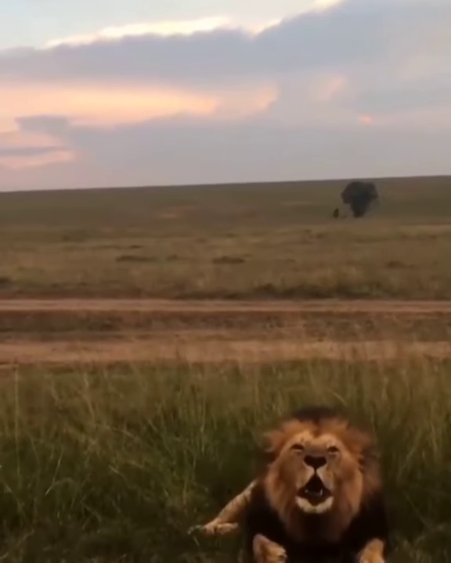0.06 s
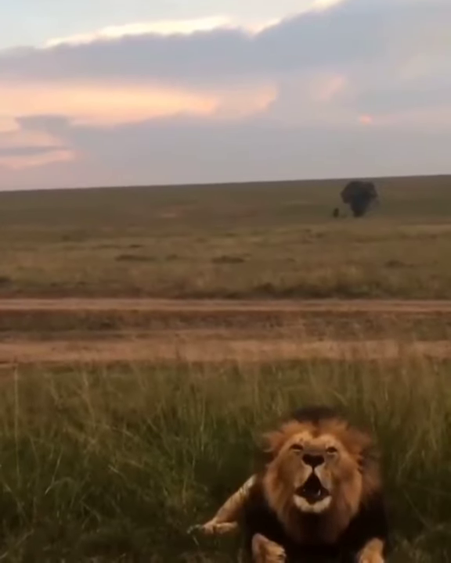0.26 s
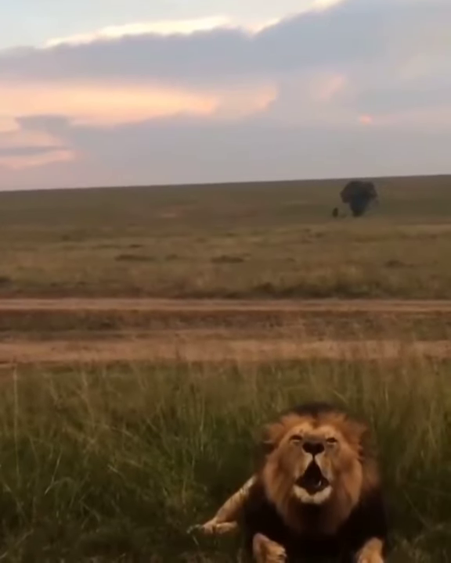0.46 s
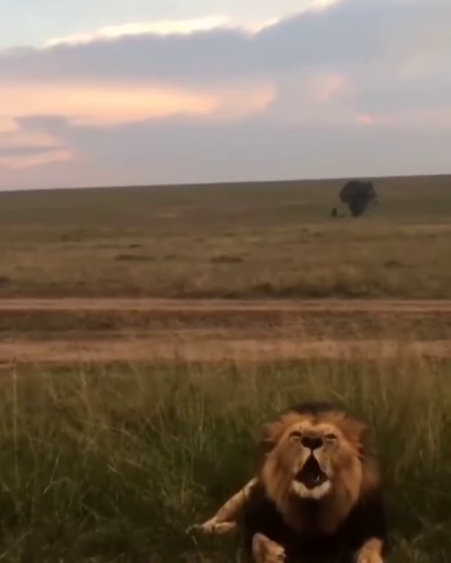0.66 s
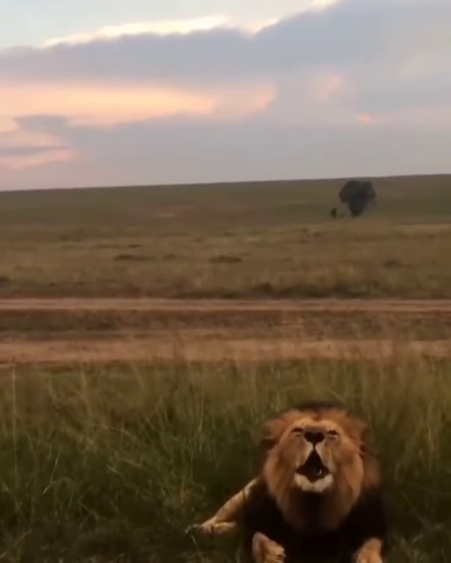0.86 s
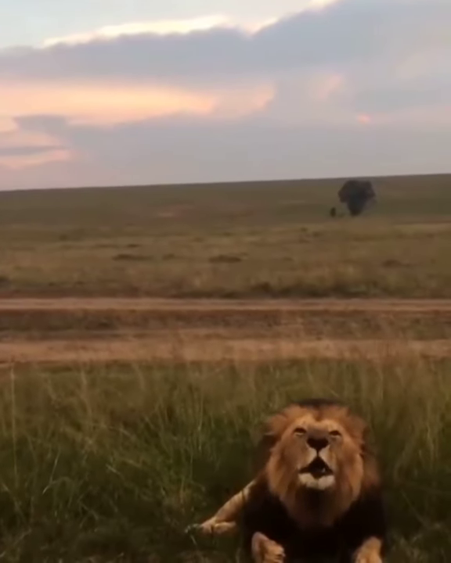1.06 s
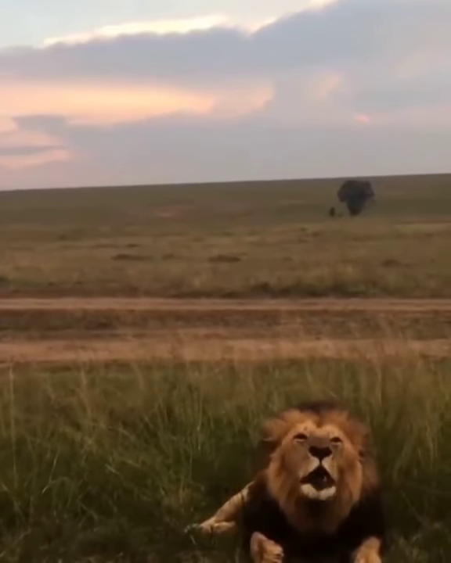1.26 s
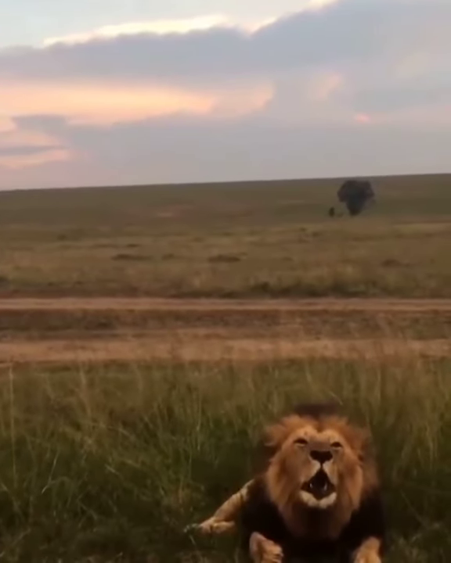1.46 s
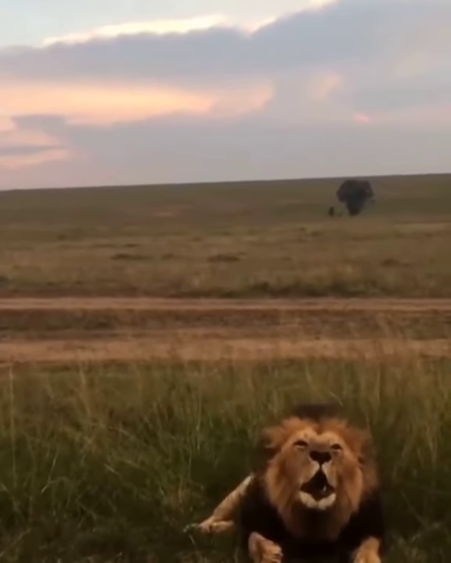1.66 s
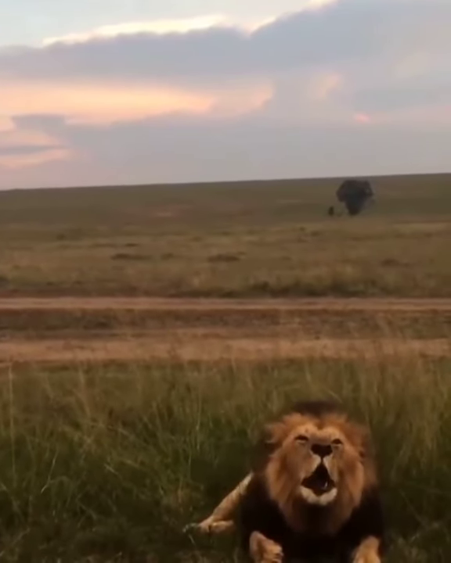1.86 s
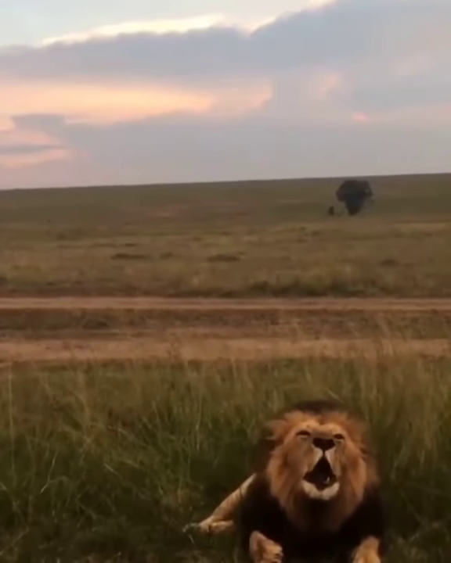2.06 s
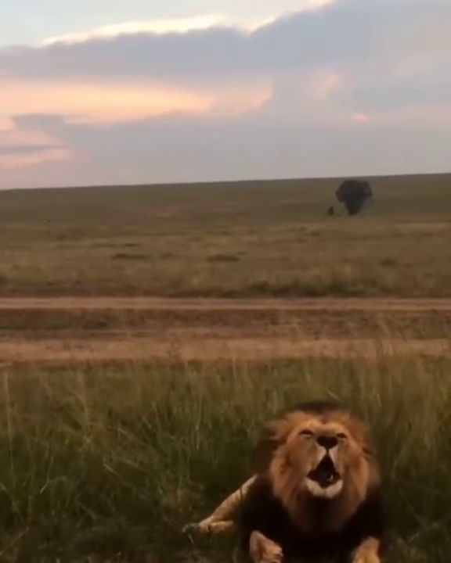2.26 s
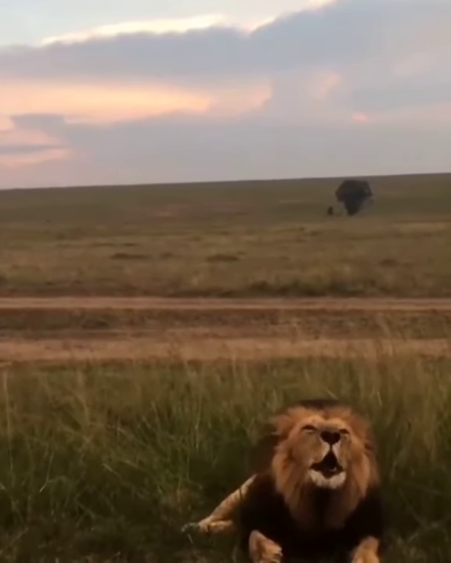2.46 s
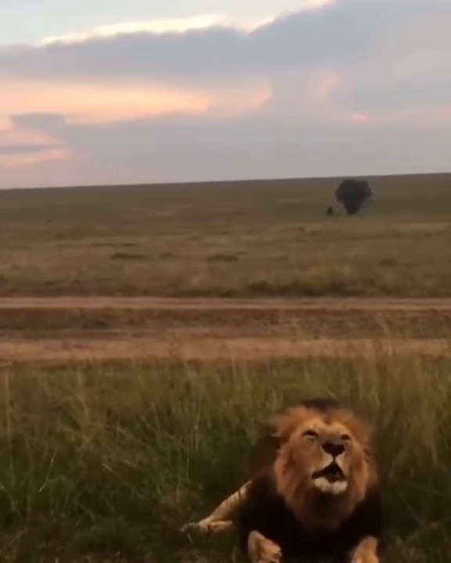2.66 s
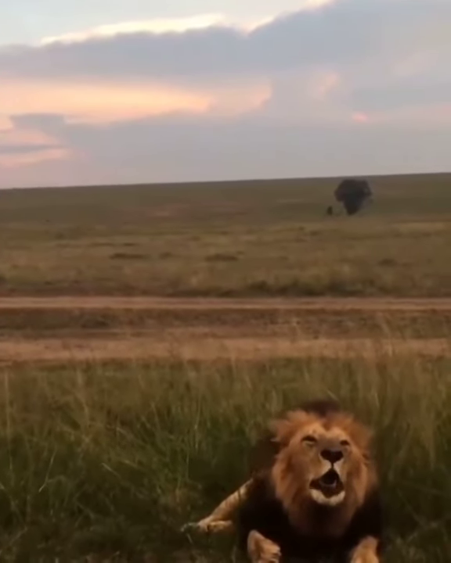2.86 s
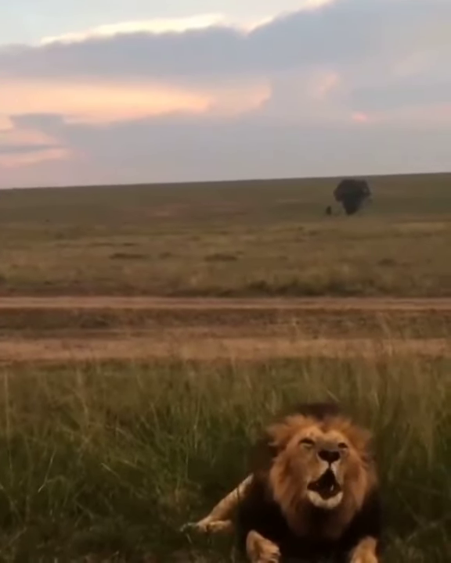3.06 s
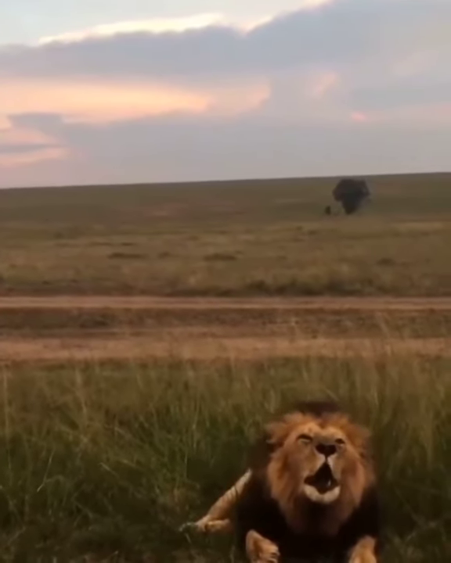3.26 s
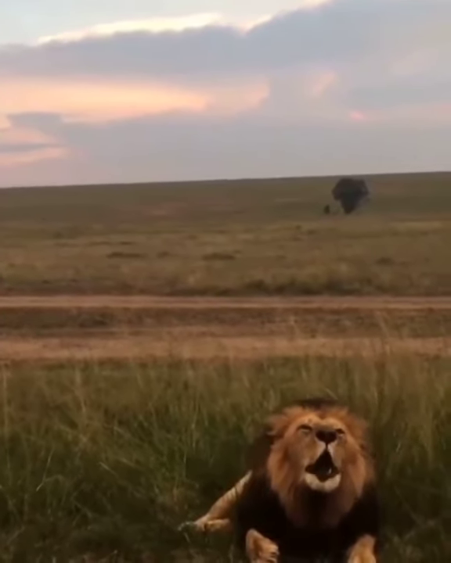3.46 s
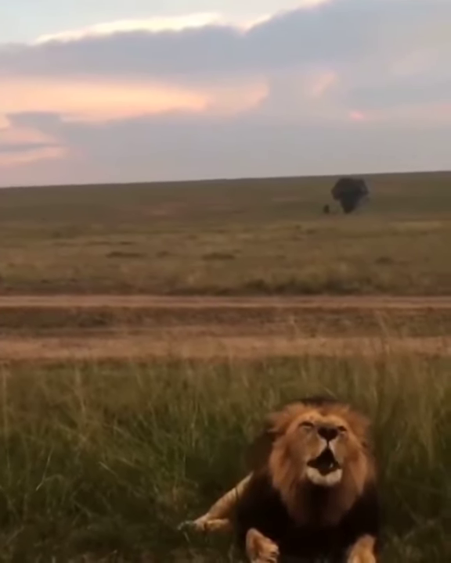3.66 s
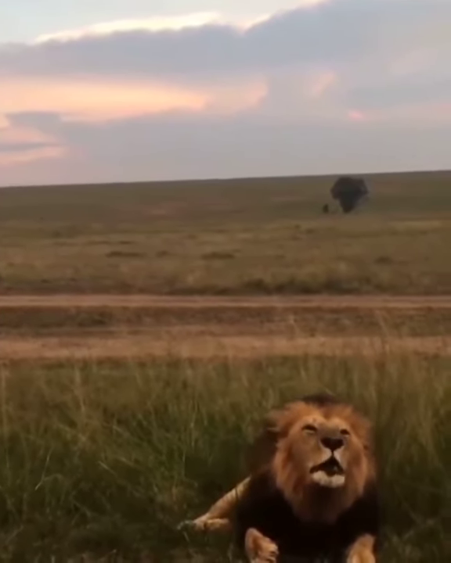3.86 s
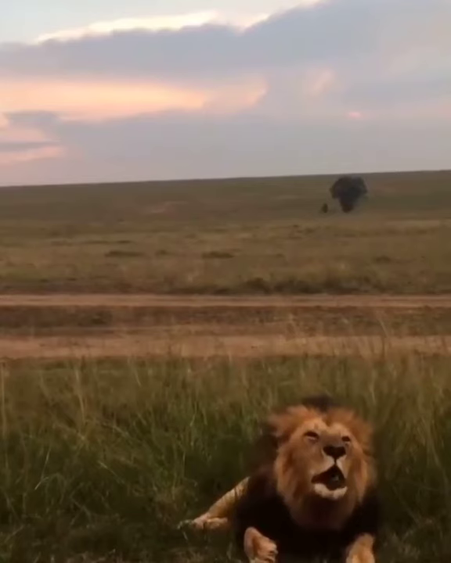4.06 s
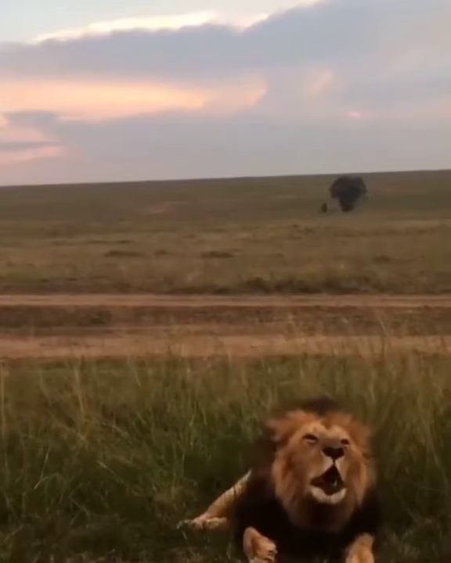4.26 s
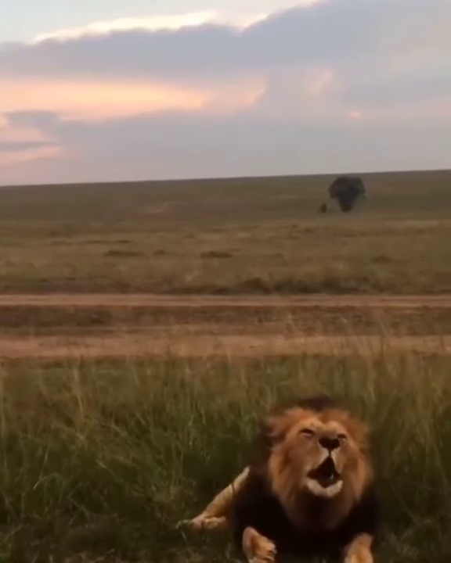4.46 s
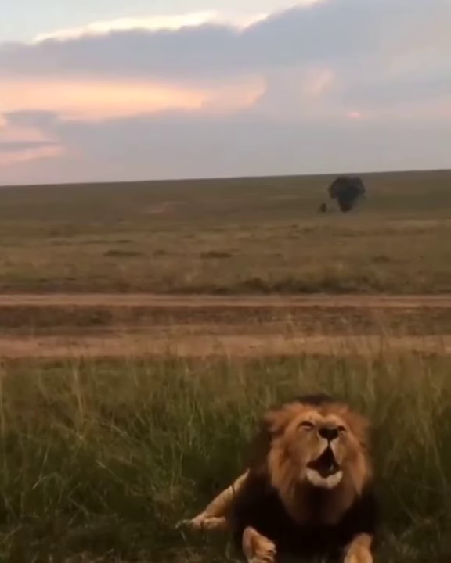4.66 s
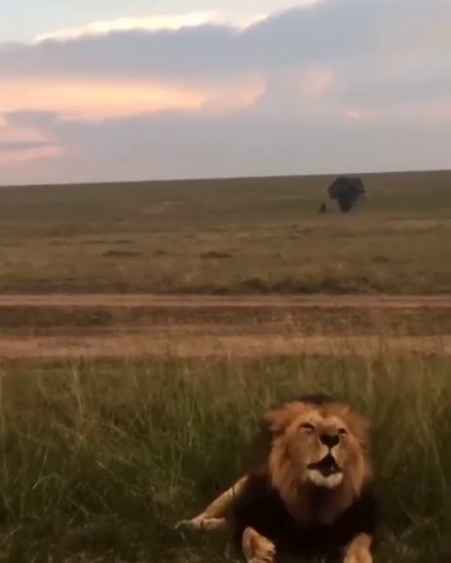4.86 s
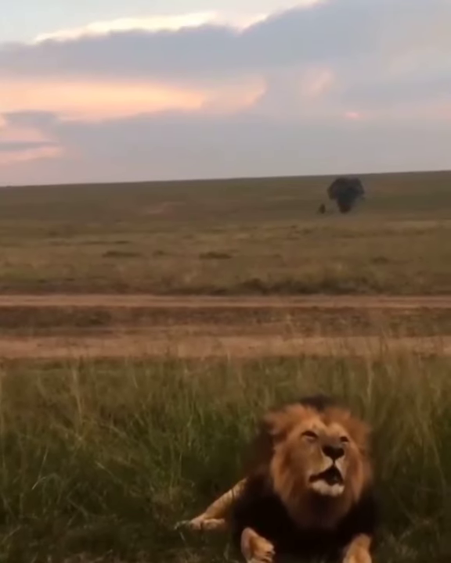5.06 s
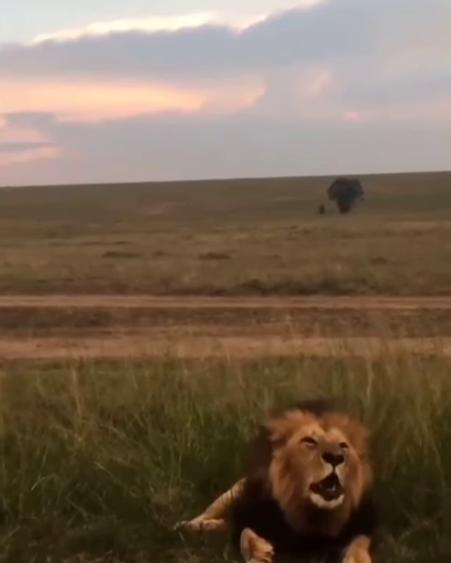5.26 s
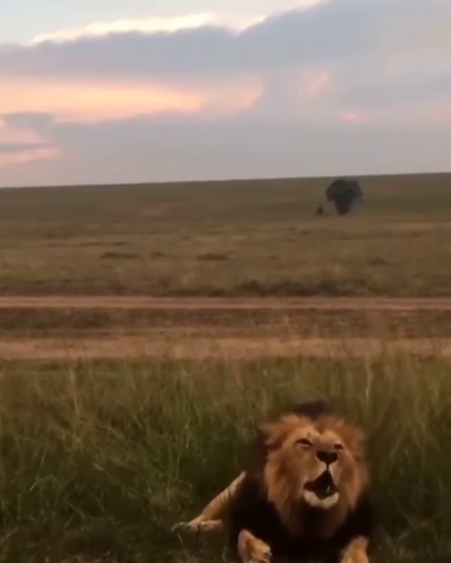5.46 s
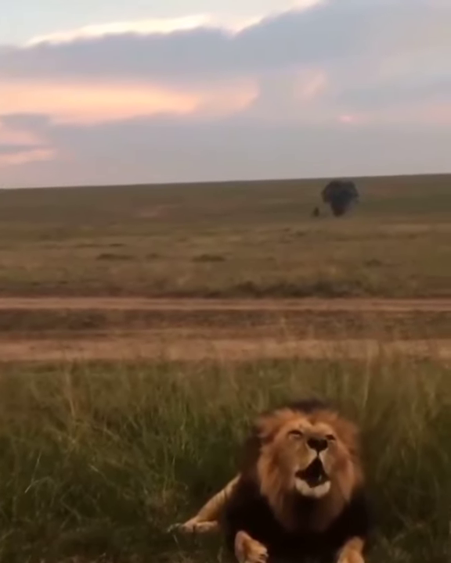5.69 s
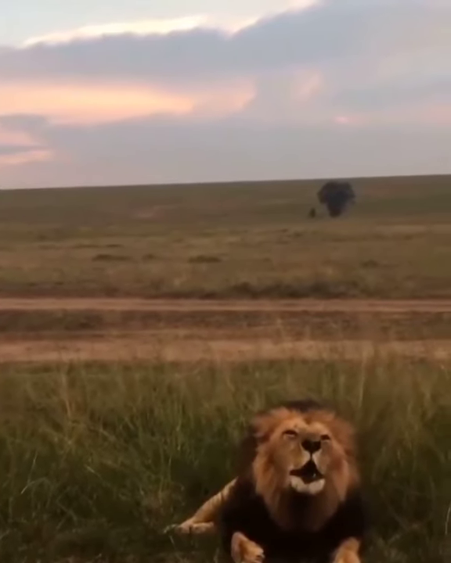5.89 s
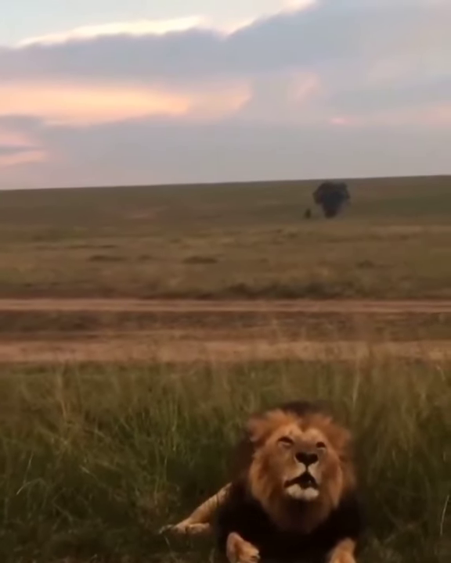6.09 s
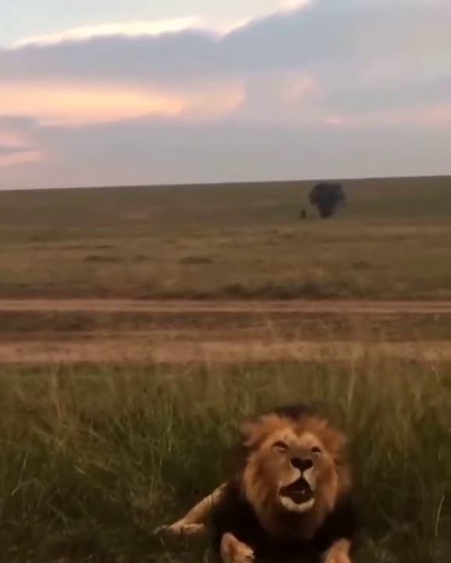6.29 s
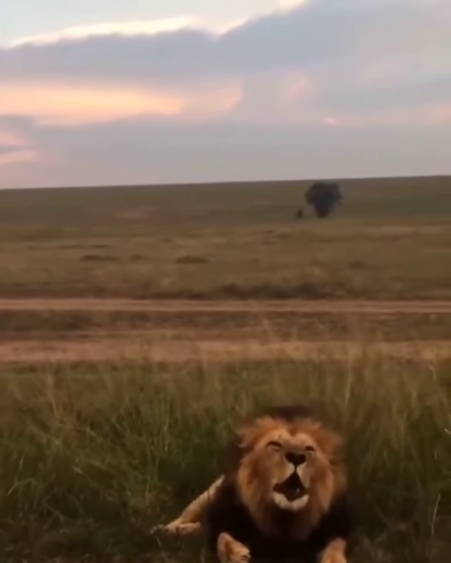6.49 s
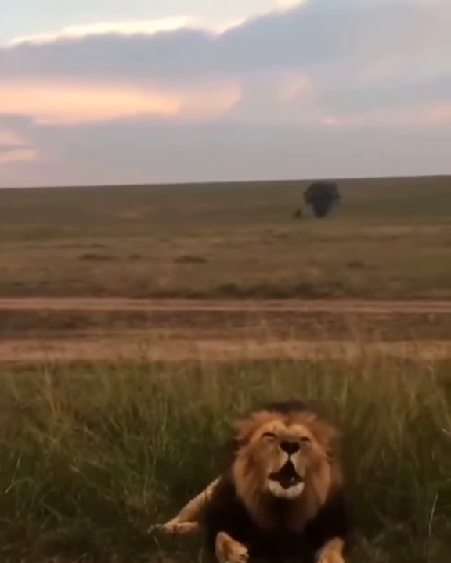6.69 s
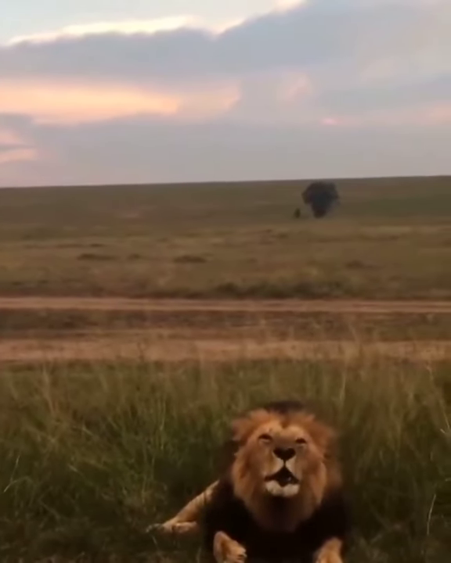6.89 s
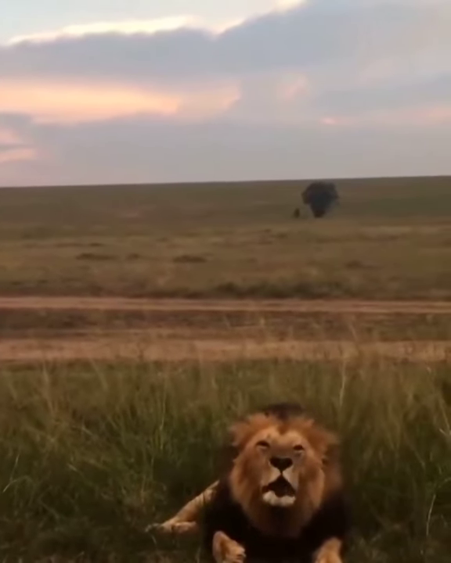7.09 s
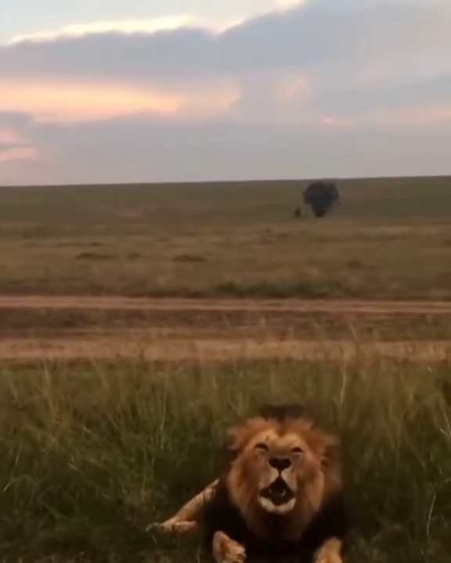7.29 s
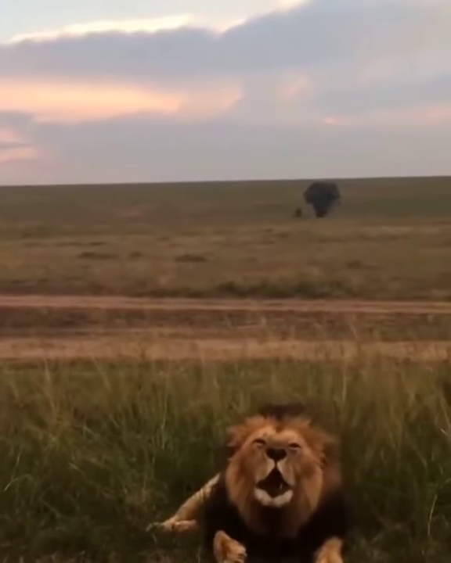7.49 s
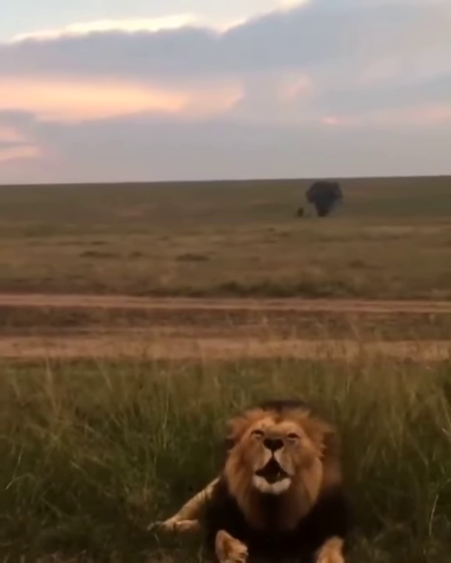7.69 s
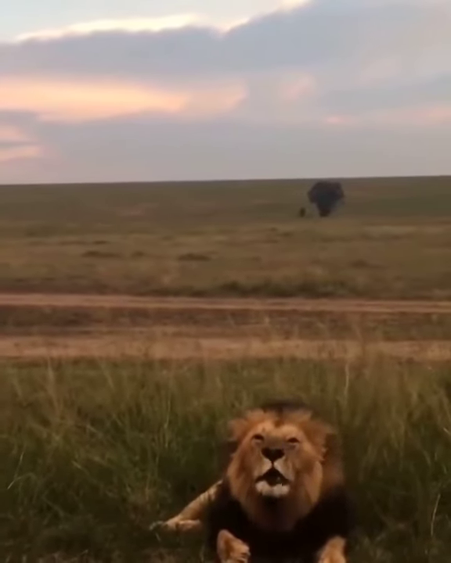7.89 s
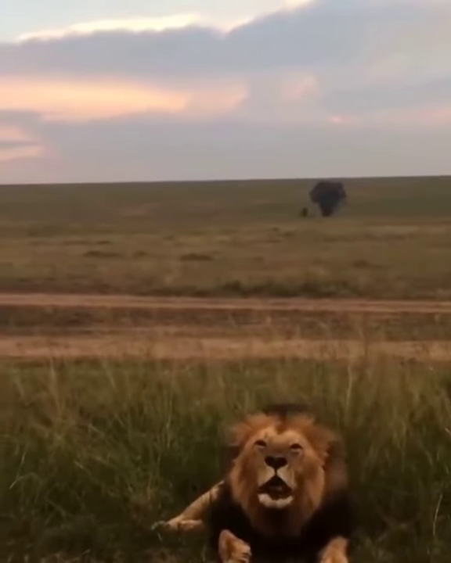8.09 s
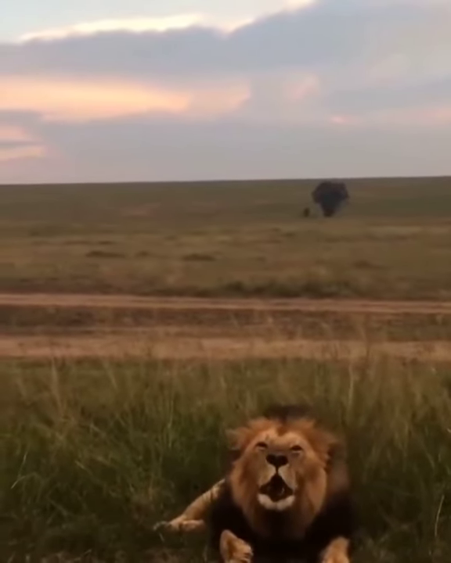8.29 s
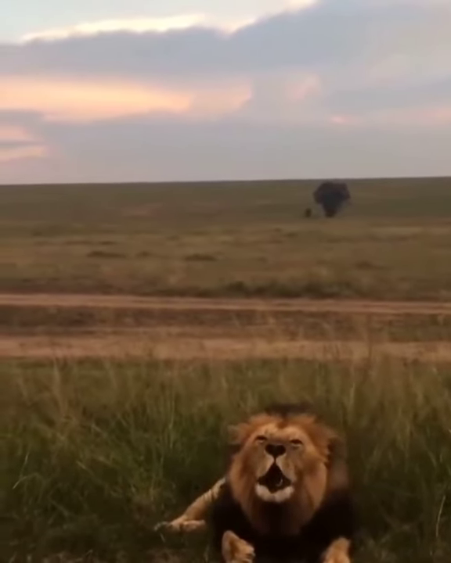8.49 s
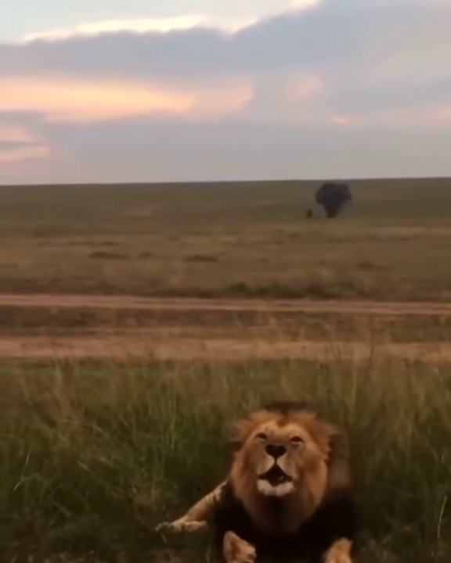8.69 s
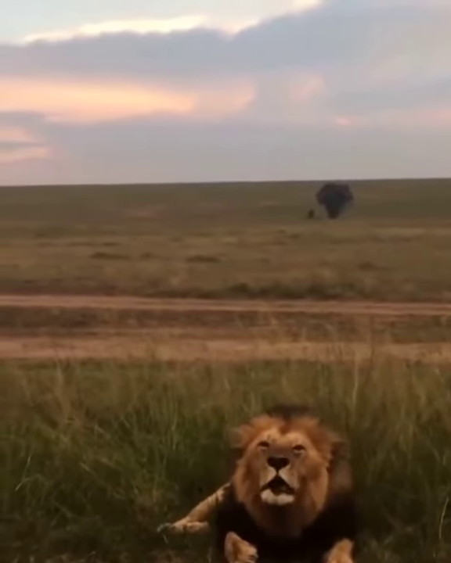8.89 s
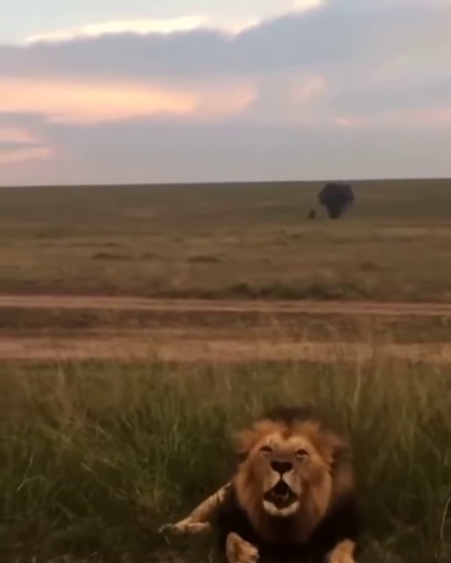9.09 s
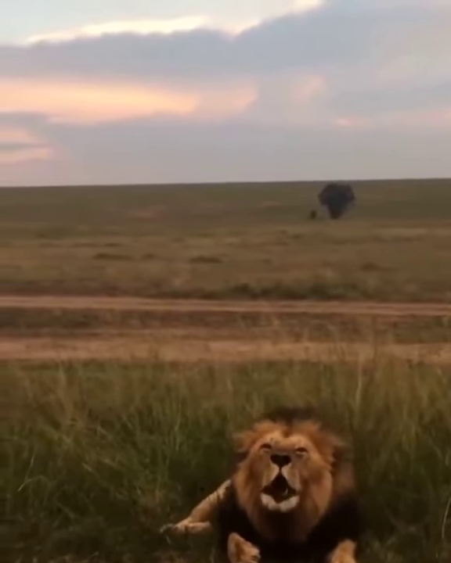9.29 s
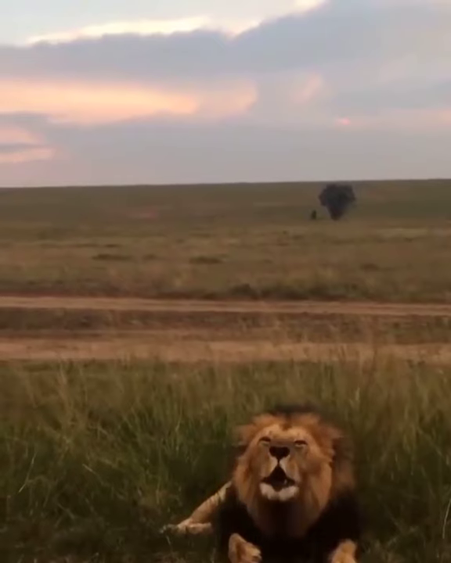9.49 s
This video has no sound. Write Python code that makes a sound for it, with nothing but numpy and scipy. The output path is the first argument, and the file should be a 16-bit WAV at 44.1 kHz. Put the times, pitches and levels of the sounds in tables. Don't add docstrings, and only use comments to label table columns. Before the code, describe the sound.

A male lion close by gives two full rough roars, then seven lower, quickening grunts, breathing in between, with camera shutter clacks and light wind.

```python
import sys
import numpy as np
from scipy import signal
from scipy.fft import rfft, irfft, next_fast_len
from scipy.io import wavfile
from scipy.ndimage import uniform_filter1d

SR = 44100
rng = np.random.default_rng(int(sys.argv[2]) if len(sys.argv) > 2 else 0)


def unload_audio(sound):
    columns = np.transpose(np.atleast_2d(sound))
    steps = np.round(np.clip(columns, -1, 1) * 32767)
    wavfile.write(sys.argv[1], SR, steps.astype(np.int16))


def convert_level_to_amplitude(level_db):
    exponent = np.asarray(level_db, float) / 20
    return 10 ** exponent


N = 420713
ROAR_HZ = 130

TRACT = [(0, .95), (.15, 1.0), (.35, 1.015), (.6, .93), (1, .86)]
# (throat, mouth, hiss [dB])
LOCKED_DB = (-3, -1.5, -0.5)
# (throat, mouth, hiss [dB/s])
TIRING_DB_PER_S = (0.1534, -.5, -0.0625)
# (throat, mouth, hiss [dB])
RASP_DB = (1.48, 2, 1.11)


def lion():
    calling = inside(call_spans(), 0.036)
    on = calling > 0
    seconds = np.flatnonzero(on) / SR
    tract, = curves([(start + share * (end - start), factor)
                     for start, end in call_spans() for share, factor in TRACT])
    tract = tract[on]
    train, even, rate, rough, halving = (c[on] for c in folds())
    slaps = -steadied(train, 0.1)
    puffs = air_puffs(train)
    chest_db, *above_db = (c[on] for c in effort())
    chest_db = chest_db + breaking()[on]
    rasp = drift(9.7)[on]
    layers = [throat(slaps, puffs, even, rough, tract), mouth(slaps, puffs, rough, tract),
              teeth_and_hiss(slaps, puffs, tract, seconds)]
    voiced = convert_level_to_amplitude(chest_db) * steadied(chest(slaps, puffs, rate, rough, halving, tract), 0.063)
    settings = zip(layers, above_db, LOCKED_DB, TIRING_DB_PER_S, RASP_DB, (0, 0, .5))
    for layer, db, lock_db, tire_db, rasp_db, extra_db in settings:
        db = db + rasp_db * rasp + lock_db * (1 - rough) ** 2 + tire_db * seconds + extra_db
        voiced = voiced + convert_level_to_amplitude(chest_db + db) * steadied(layer, 0.063)
    voice = np.zeros(N)
    voice[on] = voiced
    return -voice * calling


# (first slap [s], release begins [s], end [s], peak effort [dB], effort at release [dB])
CALLS = [
    (0.491, 1.052, 1.204, -9, -10.5),
    (1.941, 2.562, 2.75, -9.5, -11),
    (3.391, 3.808, 3.953, -11, -12.5),
    (4.58, 4.914, 5.08, -10.5, -14.5),
    (5.691, 6.028, 6.16, -10.5, -16),
    (6.706, 6.852, 7.09, -11.5, -10),
    (7.661, 7.832, 8.04, -11, -12.5),
    (8.582, 8.719, 8.93, -10, -12),
    (9.459, 9.6, 9.88, -11.5, -10),
]
LEAD_S = .045


def call_spans():
    return [(first - LEAD_S, end) for first, _, end, *_ in CALLS]


# (throat [dB], mouth [dB], hiss [dB])
OPENING = [
    (-17.5, -23.5, -23),
    (-11, -14.5, -25),
    (-6, -11.5, -23),
    (-12, -13, -21.5),
    (-17, -18.5, -32),
]


def effort():
    level, opening = [], []
    for (first, release, end, peak_db, last_db), rates in zip(CALLS, RATES):
        peak = first + 0.06
        times = [first - LEAD_S, first, peak, release, end]
        points = list(zip(times, [-36.5, peak_db - 5.5, peak_db, last_db, -38]))
        if rates[1] > ROAR_HZ:
            points.append((peak + 0.094, peak_db - 8))
        level += sorted(points)
        opening += [(s, *row) for s, row in zip(times, OPENING)]
    return curves(level) + curves(opening)


def breaking():
    half_s = 0.028
    broken = [lock[1] + half_s for lock, rates in zip(LOCKS, RATES) if rates[1] > ROAR_HZ]
    return -1 * inside([(s - half_s, s + half_s) for s in broken], .9 * half_s)


# (from [s], to [s], roughness [0-1], weakening of every second slap at the start [0-1], at the end [0-1])
LOCKS = [(.7, .89, .06, .2, 0), (2.19, 2.42, .04, .05, .05), (3.49, 3.735, .05, .1, .02),
         (4.68, 4.91, .07, .5, .03), (5.79, 5.95, .08, .65, .1), (6.76, 6.9, .28, .4, .55),
         (7.72, 7.85, .35, .65, .45), (8.64, 8.74, .31, .5, .5), (9.53, 9.65, .38, .2, .4)]
# (first slaps [Hz], top of lock [Hz], end of lock [Hz], loose again [Hz], last slaps [Hz])
RATES = [(152.6, 166, 146, 172, 121), (150.17, 169, 152, 150, 97), (85.23, 104, 91, 76, 47),
         (65.85, 100, 82, 66, 49), (70.14, 97, 84, 74, 57), (66.68, 100, 86, 80, 65),
         (76.8, 87, 82, 77, 52), (70.2, 80, 73, 58, 58), (67.6, 76, 70, 63, 60)]
LOOSE = {True: [(.8, .95), (.6, .6), (.85, .7), (.95, .9)], False: [(.45, .15), (.42, .5), (.6, .3),
         (.88, .6)]}


def tension():
    settle_s, loosen_s = .07, .05
    top_share = .3
    u = np.linspace(0, 1, 9)
    rows = []
    for (start, end), lock, rates in zip(call_spans(), LOCKS, RATES):
        a, b, rough, weak_a, weak_b = lock
        first, top, sagged, loose, last = rates
        roar = top > ROAR_HZ
        early, settling, loosened, late = LOOSE[roar]
        climb = np.minimum(0.98 + 0.02 * u / top_share, 1) * top
        sag = (top - sagged) * (np.maximum(u - top_share, 0) / (1 - top_share)) ** 1.9
        roughness = rough * (1 + (2 * u - 1) ** 4)
        weakening = weak_b + (1 - u ** 1.3) ** 2 * (weak_a - weak_b)
        before = (1.08 if roar else .82) * top
        rows += [(start, first, *early), (a - settle_s, before, *settling)]
        rows += zip(a + u * (b - a), climb - sag, roughness, weakening)
        rows += [(b + loosen_s, loose, *loosened), (end, last, *late)]
    return curves(rows)


# (time [s], strength against the usual slap [x])
SLAPS = [(0.523, 1.3), (.546, 2.1), (0.981, 0.84), (1.064, 2.3), (1.139, 1.8), (1.981, 1.3), (2.008, 2.8),
         (2.095, 1.2), (2.484, 1.1), (2.544, 1.2), (2.578, 2.5), (2.661, 6.3), (3.79, 1.6), (3.907, 5),
         (4.621, 1.1), (5.008, 2.1), (5.731, 1.1), (5.765, 1.4), (6.022, 1.1), (6.081, 3), (6.742, 1.9),
         (6.781, 1.9), (6.829, 1.5), (7.0, 3.1), (7.689, 1.6), (7.727, 0.73), (7.749, 1.4), (7.959, 3.1),
         (8.613, 2.1), (9.476, 4.3)]


def folds():
    rate, rough, halving = tension()
    wander = np.clip(1 + .3 * rough * drift(60), .2, 3)
    turns = np.cumsum(rate * wander) / SR
    even = np.diff(np.floor(turns), prepend=0)
    turns = np.maximum.accumulate(turns - .1 * halving * np.cos(np.pi * turns))
    at = np.flatnonzero(np.diff(np.floor(turns)) > 0)
    weak = np.floor(turns[at]) % 2
    train = np.zeros(N)
    size = convert_level_to_amplitude(4.5 * rough[at] * rng.standard_normal(len(at)))
    train[at] = size * (1 - halving[at] * weak)
    for s, strength in SLAPS + [(call[0], 1.6) for call in CALLS]:
        hit = round(s * SR)
        train[hit - 350:hit + 200] = 0
        train[hit] = strength
    return train, even, rate, rough, halving


def air_puffs(train):
    jet = signal.lfilter([1], [1, -np.exp(-1 / (.008 * SR))], train)
    return steadied((.5 + jet) * rng.standard_normal(len(train)), .1)


# (frequency [Hz], width [Hz], level [dB])
CHEST = [(149.1, 33.8, 12), (187, 128, -2)]


def chest(slaps, puffs, rate, rough, halving, tract):
    low = slaps + (.006 + .2 * rough) * puffs
    swing = resonate(low, [(0.91, 40.4, -1.7)], rate * (1 - halving ** 3 / 2))
    boom = swing - resonate(low, CHEST[:1], tract ** 1.89)
    boom = boom + (1 - rough) ** 2 * resonate(low, CHEST[1:], tract ** 1.3)
    return band(band(boom, 62, "high"), 376, "low")


# (frequency [Hz], width [Hz], level [dB])
THROAT = [(287.4, 41, -12), (356.3, 31.6, 4.26)]
# (frequency [Hz], width [Hz], level [dB])
PHARYNX = [(441.5, 52.3, -15), (577, 35, -26.5), (848, 167, -27)]
# (frequency [Hz], width [Hz], level [dB])
OPEN_THROAT = [(315, 100, -2.5), (394, 91, -6.5), (844, 230, -18.5)]


def throat(slaps, puffs, even, rough, tract):
    middle = slaps + (.04 + .3 * rough) * puffs
    loose = -resonate(middle, THROAT, tract)
    loose = loose - resonate(middle + 1.68 * puffs, PHARYNX, tract ** 0.2, patchy_db=4.0)
    locked = np.clip(1 - rough / .3, 0, 1)
    held = locked > 0
    sung = np.zeros(len(locked))
    sung[held] = resonate(steadied(even, .12)[held], OPEN_THROAT, tract[held])
    return band((1 - 0.78 * locked) * loose + locked * sung, 246, "high")


# (frequency [Hz], width [Hz], level [dB])
MOUTH = [(1061.7, 47, -2.5), (1184, 58, -1.5), (1382, 77.5, -7), (1593, 39, -13.5)]


def mouth(slaps, puffs, rough, tract):
    scale = tract ** .4 * (1 + .012 * drift(8, len(tract)))
    return resonate(slaps + (.28 + .75 * rough) * puffs, MOUTH, scale, patchy_db=3.5)


# (frequency [Hz], width [Hz], level [dB])
TEETH = [(1840, 90, -5.5), (1998, 44, 5.5), (2227, 48, -3), (2590, 70, 2.5), (2834, 27, 5),
         (3190, 110, -0.5), (3930, 128, -2.5), (5760, 440, -5.5), (7080, 1500, -20.5)]
# (frequency [Hz], width [Hz], level [dB])
PALATE = [(4307, 337, -0.5)]
# (frequency [Hz], level [dB per Hz])
HISS = [(880, -34.5), (1500, 1), (1760, -10.5), (2810, -7.5), (9700, -14.5), (11700, -16.5), (13800, -21.5),
        (14600, -45.5)]


def teeth_and_hiss(slaps, puffs, tract, seconds):
    n = len(puffs)
    scale = tract ** .3 * (1 + .015 * drift(6, n))
    teeth = resonate(.6 * slaps + puffs, TEETH, scale, patchy_db=4.0)
    palate = resonate(puffs, PALATE, tract ** 0.17, patchy_db=2.5)
    teeth = teeth + convert_level_to_amplitude(0.88 * seconds + 1.0) * tract ** 11 * palate
    hiss = coloured(puffs + 1.74 * rng.standard_normal(n), HISS) * convert_level_to_amplitude(1.2 * drift(19, n))
    return evened(teeth) + 0.91 * hiss


# (start [s], fullest level [dB])
BREATHS = [(0.032, -57.5), (1.492, -55.5), (2.99, -54.5), (4.24, -53.5), (5.27, -59), (6.382, -56.5),
           (7.33, -57.5), (8.309, -54), (9.16, -58)]
# (frequency [Hz], width [Hz], level [dB])
INDRAWN = [(159.6, 25, 10), (345, 49, -2), (455, 29, -1), (748, 8.1, -6), (1119, 99, -1), (1390, 61, -5.5),
           (1910, 340, -19.5), (3050, 460, -31.5), (4320, 520, -28)]


def breath():
    lasting = [(start, call + 0.0485) for (start, _), (call, _) in zip(BREATHS, call_spans())]
    rows = []
    for (a, b), (_, db) in zip(lasting, BREATHS):
        rows += [(a, db - 27), (a + 0.021, db - 7.5), (b - .12, db), (b, db - 3)]
    level_db, = curves(rows)
    drawing = inside(lasting, 0.023)
    on = drawing > 0
    scale = 1 + 0.032 * drift(3.5)[on]
    rush = np.zeros(N)
    rush[on] = evened(resonate(rng.standard_normal(len(scale)), INDRAWN, scale, patchy_db=3.0))
    return rush * drawing * convert_level_to_amplitude(level_db + 6.0)


SHUTTER_S = [1.361, 3.999, 5.076]
# (delay [s], level [dB], rattle [s])
SHUTTER = [(0, -52, 0.012), (0.016, -50, 0.02), (0.045, -52.5, 0.016), (0.085, -48, 0.027),
           (.1, -45.5, 0.025), (.115, -70, 0.021)]
# (frequency [Hz], level [dB per Hz])
SHUTTER_BODY = [(210, -56), (350, -50), (659, 1.5), (805, -9.5), (884, -36), (1110, -7.5), (1490, -10.5),
                (1940, -12.5), (2100, -16.5), (3490, -18), (14000, -40)]


def shutter():
    t = np.arange(SR // 4) / SR
    power = np.zeros(N)
    for s, db in zip(SHUTTER_S, [0, -1.5, -3]):
        for delay, part_db, rattle in SHUTTER:
            at = round((s + delay) * SR)
            shape = (1 - np.exp(-t / 0.00051)) * np.exp(-2 * t / rattle)
            power[at:at + len(t)] += convert_level_to_amplitude(db + part_db) ** 2 * shape
    return np.sqrt(power) * coloured(rng.standard_normal(N), SHUTTER_BODY)


# (time [s], level [dB])
GUSTS = [(0, -40), (.11, -57.5), (.43, -44), (1.25, -57.5), (1.73, -49.5), (1.86, -55.5), (2.8, -46.5),
         (3.0, -56.5), (3.34, -53), (4.2, -40), (4.5, -41.5), (5.3, -49.5), (6.38, -44), (7.08, -64),
         (7.21, -42.5), (7.3, -50.5), (8.2, -49), (9.2, -43)]
# (frequency [Hz], level [dB per Hz])
WIND = [(8.8, -61), (15, -28.5), (41, 4.5), (64, 9), (107, -2.5), (170, -18), (267, -45), (453, -36.5),
        (700, -53), (910, -72), (1540, -120)]


def wind():
    gust_db, = curves(GUSTS)
    return coloured(rng.standard_normal(N), WIND) * convert_level_to_amplitude(gust_db + 2.8 * drift(8.4) + 1.8 * drift(4.4))


# (from [s], to [s], level [dB])
VEIL = [(0.105, .3, -68), (1.226, 1.498, -64.5), (2.729, 2.996, -66), (3.958, 4.208, -64.5),
        (5.048, 5.237, -63.5), (6.171, 6.317, -67), (7.067, 7.358, -64.5), (8.04, 8.261, -64.5),
        (8.931, 9.154, -66)]
# (frequency [Hz], level [dB per Hz])
VEIL_COLOUR = [(180, -24), (300, -23.5), (429, -61.5), (594, 7.5), (1140, -32.5), (1650, -4), (13200, -16),
               (14600, -47)]


def veil():
    rows = []
    for a, b, db in VEIL:
        rows += [(a, -95), (a + 0.042, db - 4.5), (b - .015, db), (b + .01, -95)]
    level_db, = curves(rows)
    return coloured(rng.standard_normal(N), VEIL_COLOUR) * convert_level_to_amplitude(level_db + 1.3 * drift(27))


# (frequency [Hz], level [dB per Hz])
AIR = [(120, -43), (200, 4), (457, -5.5), (654, -12), (1230, -9.5), (2300, -20), (12600, -28), (14600, -43)]


def air():
    return coloured(rng.standard_normal(N), AIR) * convert_level_to_amplitude(-64)


def evened(x):
    return x / np.sqrt(np.mean(x ** 2) + 1e-20)


def steadied(x, window_s):
    size = round(window_s * SR)
    power = uniform_filter1d(uniform_filter1d(x ** 2, size), size)
    return x / np.sqrt(abs(power) + 1e-14)


def curves(rows):
    s, *columns = np.transpose(rows)
    return [np.interp(np.arange(N) / SR, s, c) for c in columns]


def inside(spans, fade_s):
    t = np.arange(N) / SR
    return sum(np.interp(t, [a, a + fade_s, (a + b) / 2, b - fade_s, b], [0, 1, 1, 1, 0]) for a, b in spans)


def drift(hz, size=N):
    slow = signal.butter(2, hz, fs=SR / 64, output="sos")
    coarse = signal.sosfilt(slow, rng.standard_normal(N // 64 + 2))
    return np.interp(np.arange(size) / 64, np.arange(len(coarse)), evened(coarse))


def coloured(x, points):
    f, db = np.transpose(points)
    size = next_fast_len(len(x))
    hz = np.fft.rfftfreq(size, 1 / SR)
    gain = convert_level_to_amplitude(np.interp(np.log(hz + 1), np.log(f + 1), db))
    return evened(irfft(rfft(x, size) * gain, size)[:len(x)])


def resonate(x, modes, scale, patchy_db=0):
    base = 2 * np.pi * np.cumsum(scale) / SR
    out = 0
    for k, (hz, width, db) in enumerate(modes):
        turn = np.exp(1j * hz * base)
        r = np.exp(-np.pi * 1.55 * width / SR)
        z = signal.lfilter([(1 - r) ** 2], [1, -2 * r, r * r], x * turn.conj())
        if patchy_db:
            db = db + patchy_db * drift(11.9, len(x))
        out = out + (-1) ** k * convert_level_to_amplitude(db) * (turn * z).real
    return out


def band(x, hz, kind):
    return signal.sosfilt(signal.butter(4, hz, kind, fs=SR, output="sos"), x)


def scene():
    voice = lion()
    bounce = np.concatenate([np.zeros(round(0.0028 * SR)), voice])[:N]
    ducking = convert_level_to_amplitude(-9.0 * inside(call_spans(), 0.16))
    surroundings = breath() + wind() + veil() + air()
    return (voice + 0.09 * bounce + ducking * surroundings + shutter())[None]


def low_pass(x):
    return signal.sosfilt(signal.butter(12, 14750, fs=SR, output="sos"), x)


def record(dry):
    ceiling = 1.1
    mix = ceiling * np.tanh(dry / ceiling)
    return low_pass(mix)


dry = scene()
out = record(dry)
unload_audio(out)
```